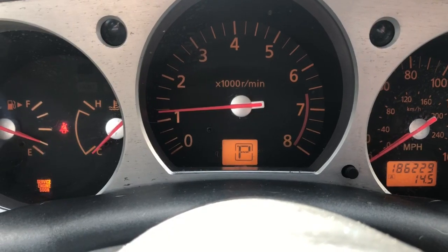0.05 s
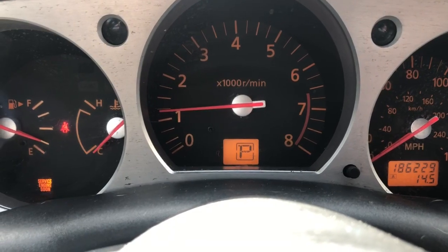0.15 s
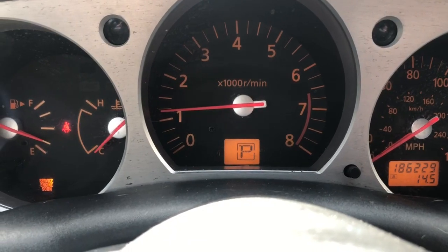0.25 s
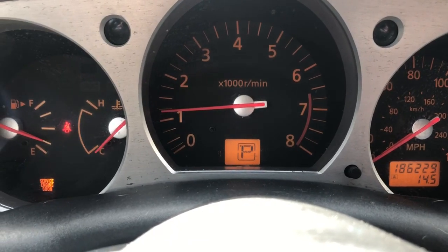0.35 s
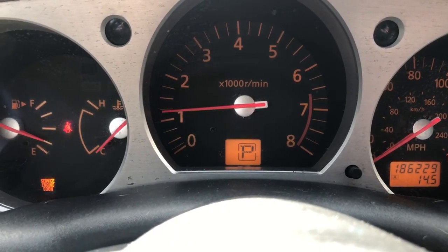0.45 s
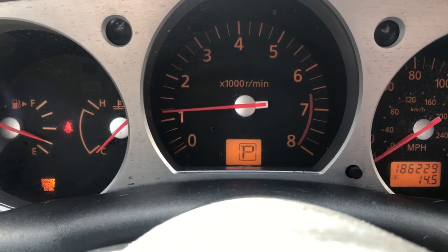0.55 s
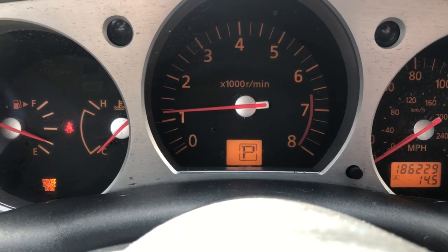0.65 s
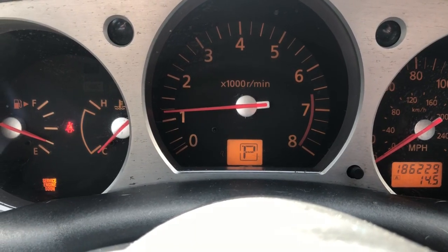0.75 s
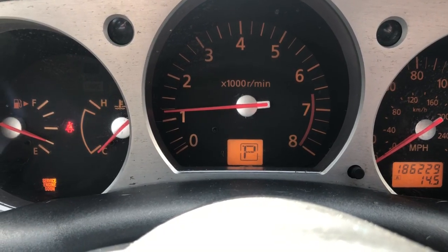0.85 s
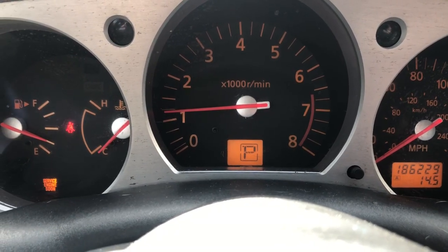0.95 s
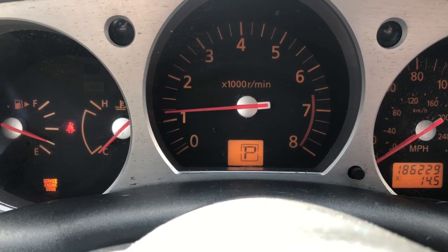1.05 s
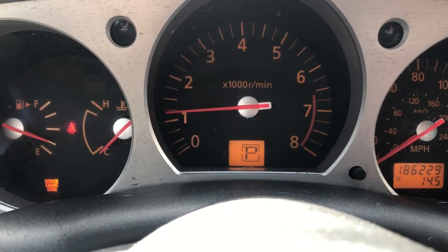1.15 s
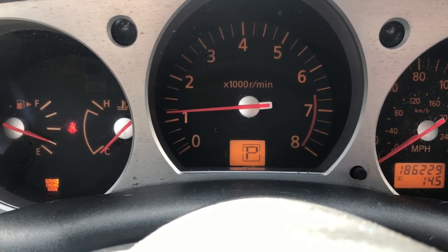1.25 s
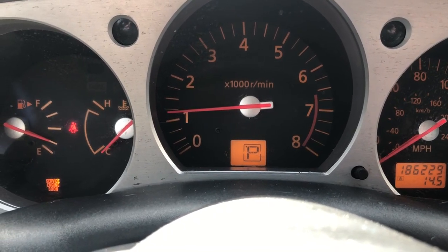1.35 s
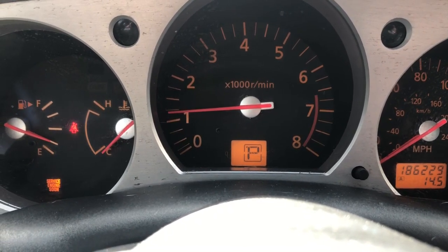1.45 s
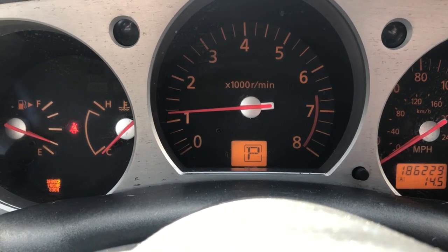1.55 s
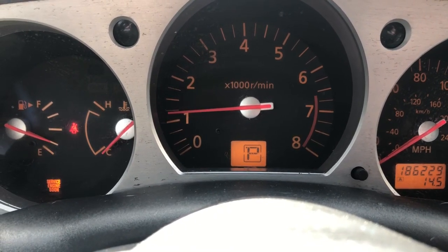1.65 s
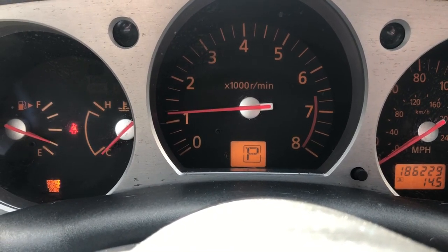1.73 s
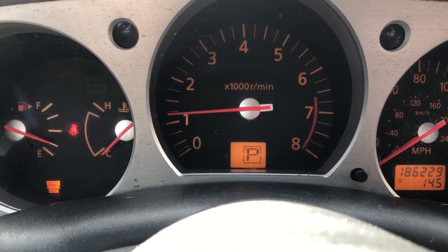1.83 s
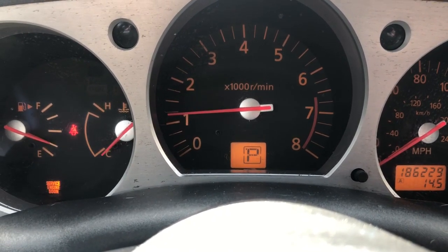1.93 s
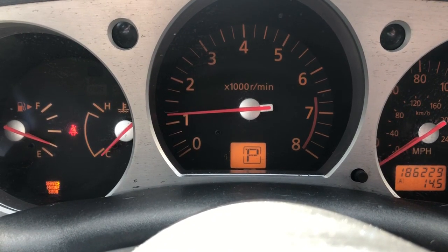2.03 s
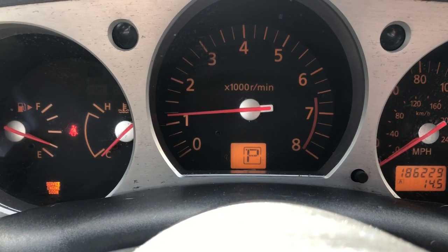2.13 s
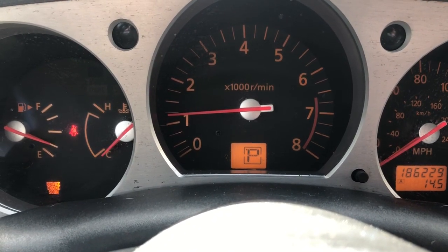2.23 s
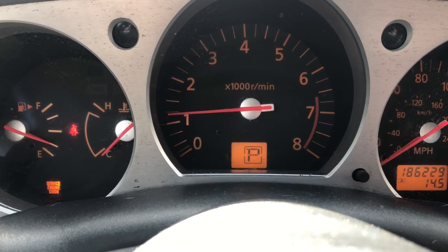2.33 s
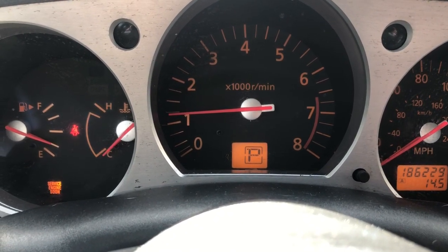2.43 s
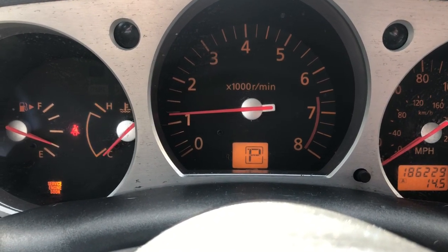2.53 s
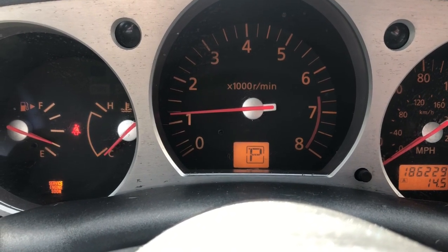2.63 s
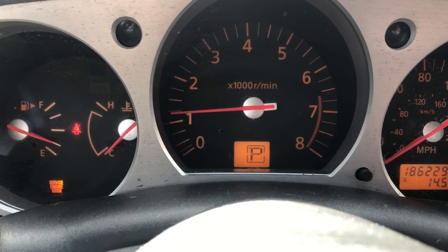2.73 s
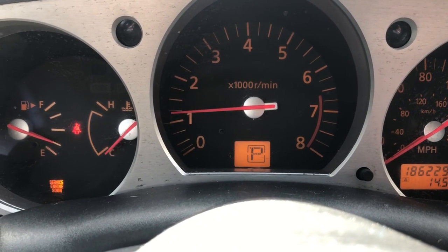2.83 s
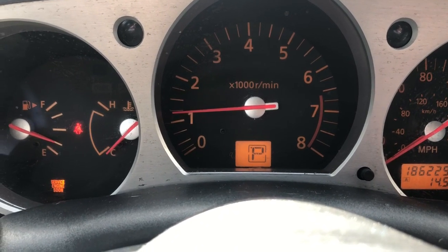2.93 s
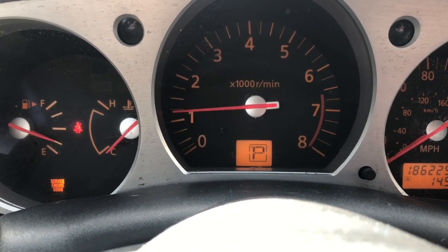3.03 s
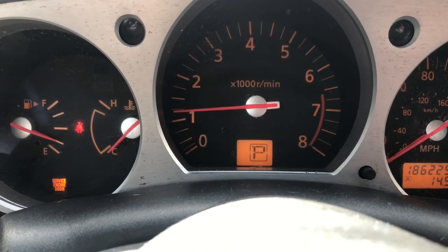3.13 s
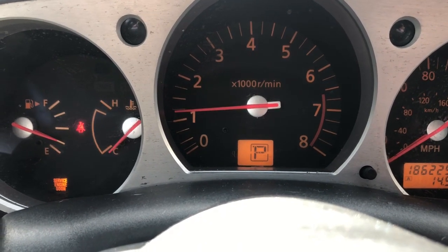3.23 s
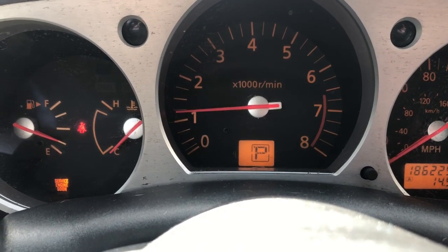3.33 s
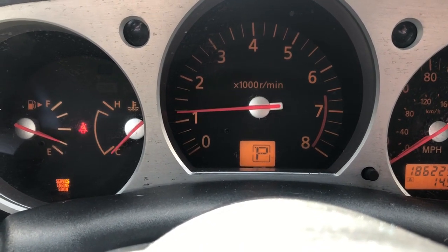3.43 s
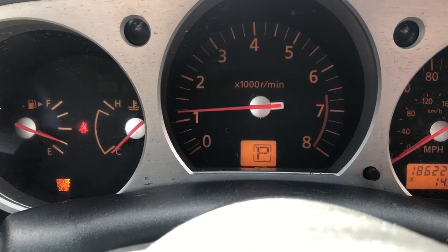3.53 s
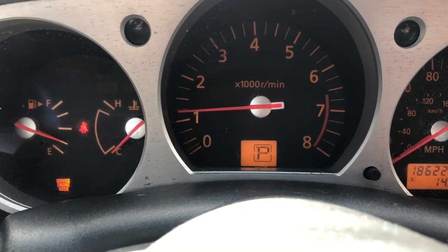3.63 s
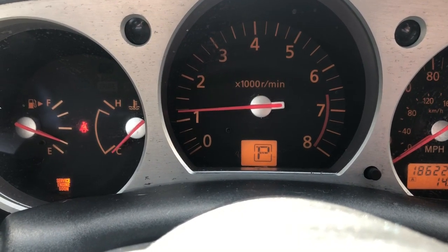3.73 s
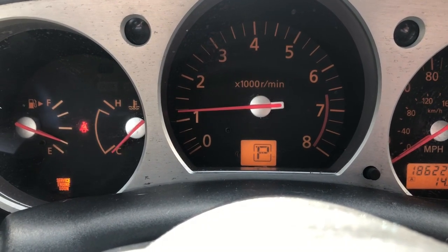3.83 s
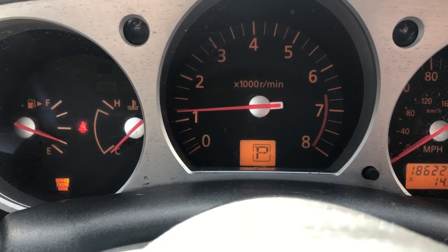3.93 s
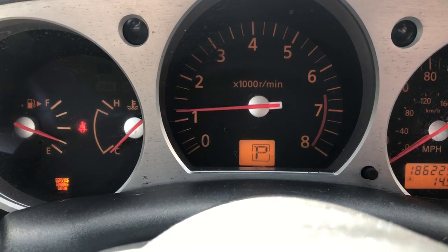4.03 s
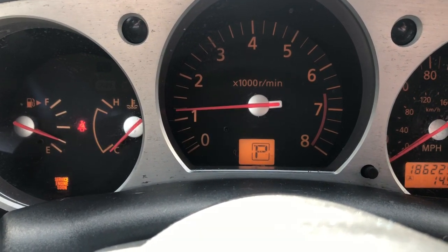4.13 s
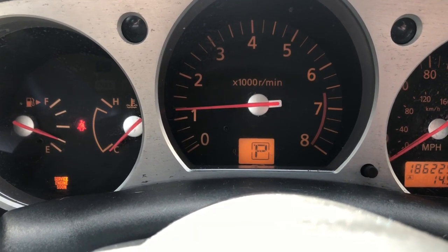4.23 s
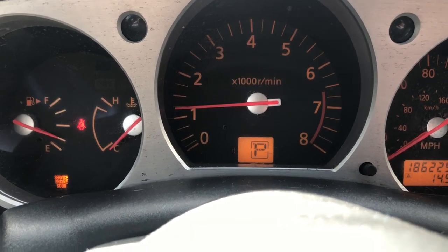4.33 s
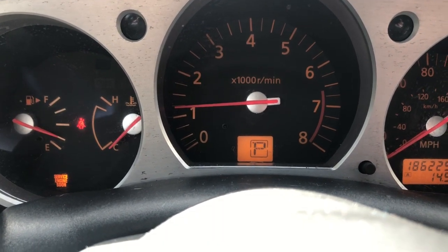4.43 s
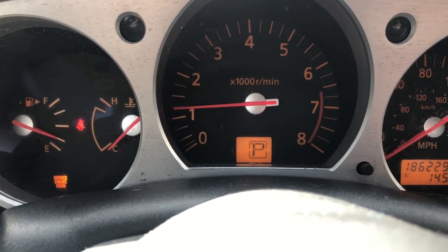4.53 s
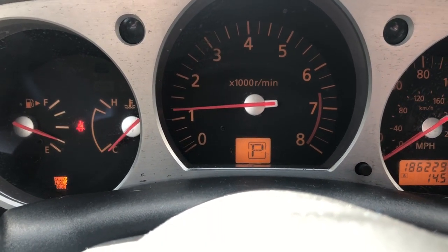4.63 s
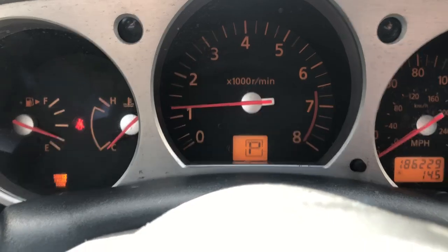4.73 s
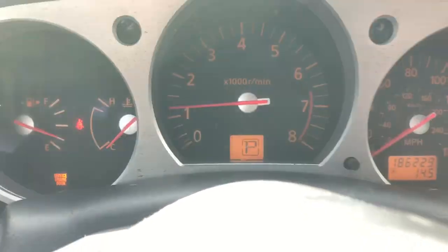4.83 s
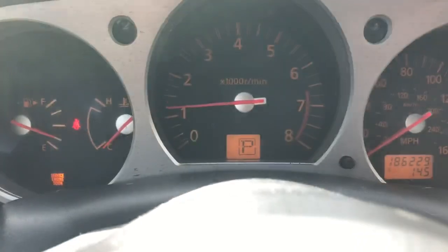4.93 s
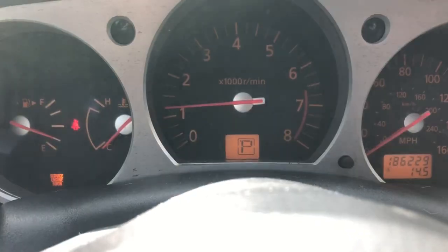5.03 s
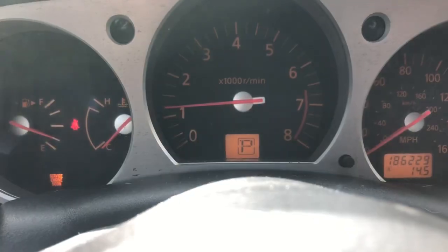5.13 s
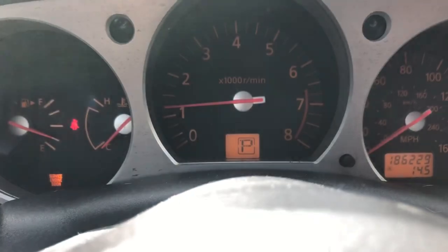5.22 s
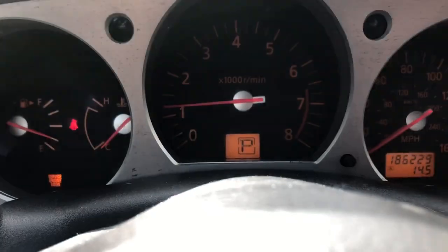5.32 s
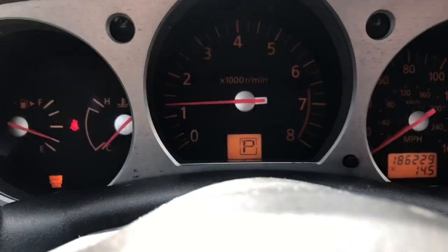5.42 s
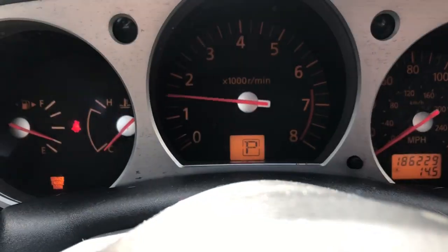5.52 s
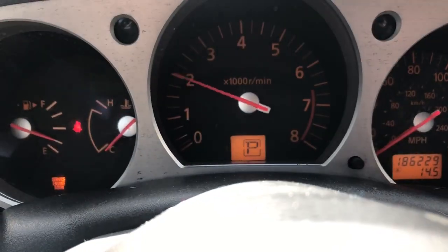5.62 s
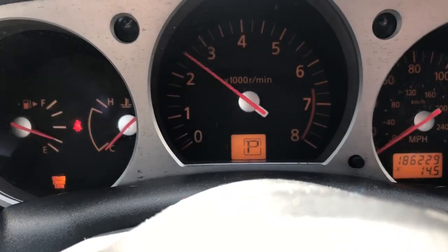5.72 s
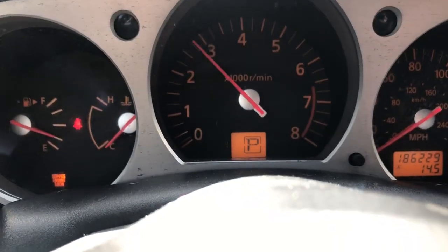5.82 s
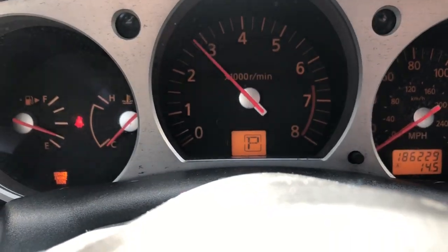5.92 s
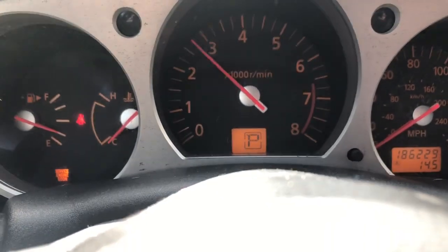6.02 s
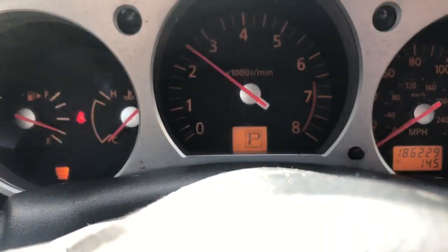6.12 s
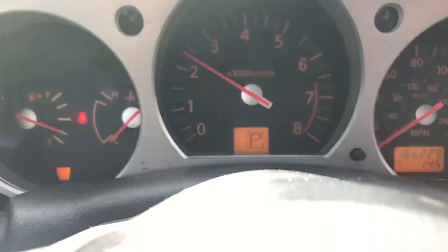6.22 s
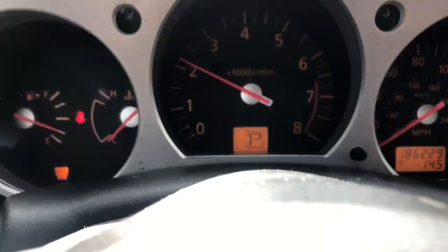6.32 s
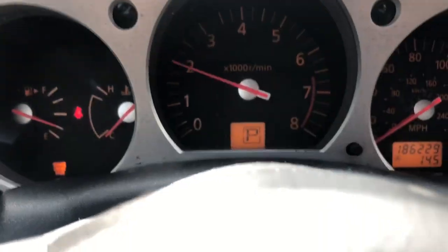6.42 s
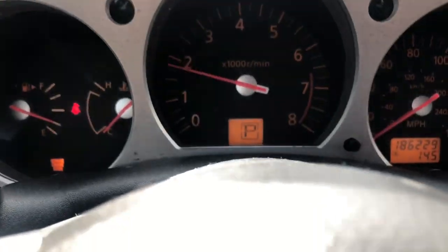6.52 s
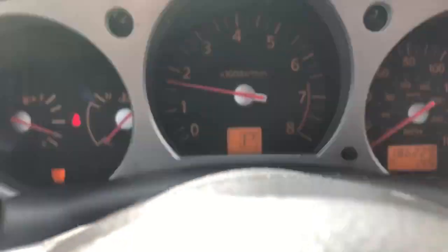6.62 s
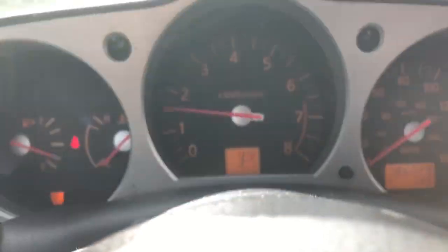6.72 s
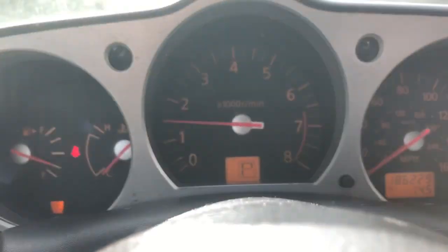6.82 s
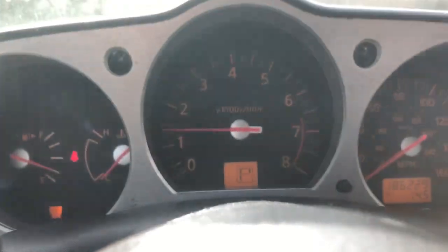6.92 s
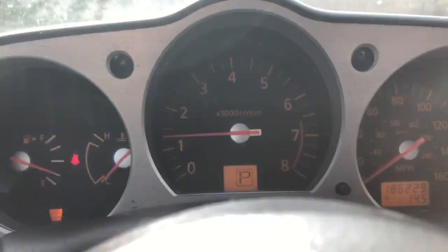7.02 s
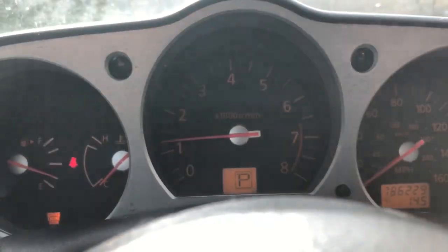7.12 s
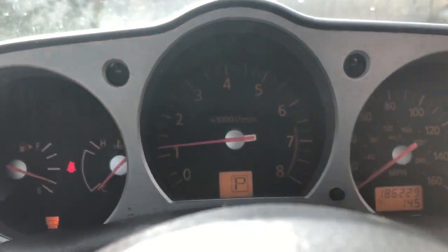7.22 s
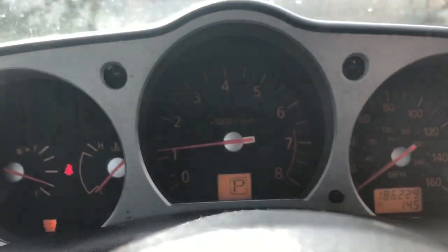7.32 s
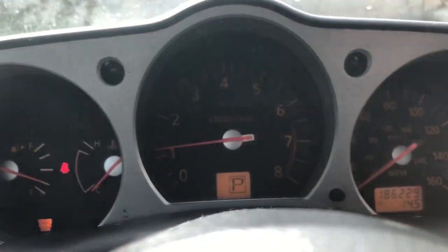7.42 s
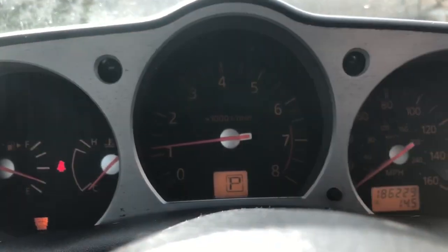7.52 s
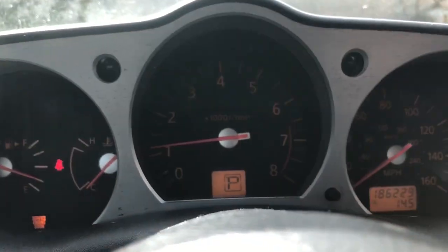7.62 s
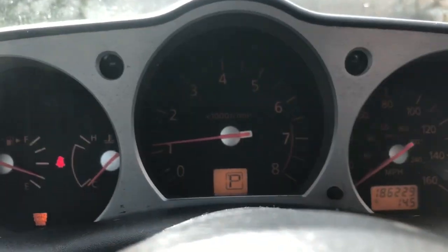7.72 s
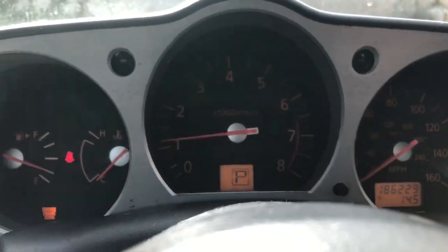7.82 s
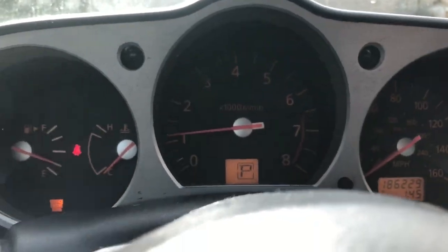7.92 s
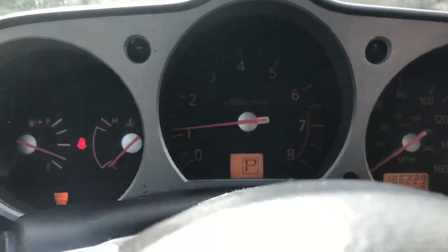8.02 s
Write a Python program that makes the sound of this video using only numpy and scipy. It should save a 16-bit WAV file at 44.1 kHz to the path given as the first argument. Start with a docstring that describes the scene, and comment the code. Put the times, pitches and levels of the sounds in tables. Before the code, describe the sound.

From inside a closed, parked car, the engine rumbles evenly at idle over a faint electrical whine from the dashboard. After about five seconds it revs once, climbing quickly in pitch and loudness with an intake roar, then falls more slowly to its low hum. As it settles, light clicks, one small hollow pop and some soft scuffs come from close by.

```python
"""The driver's seat of a parked car, doors shut, with a V6 idling.
One blip of the throttle takes it to 2600 rpm: the firing tones sweep through the cabin's booms,
the intake roars and the alternator whines, then it sinks back to idle.
Electrics sing faintly under the dash; a few small clicks, rubs and one hollow pop sound close by."""
import sys
import numpy as np
from scipy import signal
from scipy.fft import rfft, irfft, next_fast_len
from scipy.io import wavfile
from scipy.ndimage import uniform_filter1d

SR = 44100
rng = np.random.default_rng(int(sys.argv[2]) if len(sys.argv) > 2 else 0)


def persist_wave(psi):
    """Save psi, clipped to +-1, as 16-bit WAV."""
    counts = np.round(np.clip(psi, -1, 1) * 32767).astype(np.int16)
    wavfile.write(sys.argv[1], SR, np.atleast_2d(counts).T)


N = 355490
TIME = np.arange(N) / SR
IDLE_TURNS, TOP_TURNS = 18.8, 44  # crank turns a second
OPEN_AT_S, OPENING_S, SHUT_AT_S, SHUTTING_S = 5.39, 0.12, 5.683, 0.23  # the throttle blip
EXHAUST_LAG_S = 0.03
MOVE_AT_S, MOVING_S = 5.1, 0.68  # the microphone moves once, away from the valve hiss


def amp(db):
    """Decibels to gain."""
    return np.exp(np.asarray(db) * (np.log(10) / 20))


def unit_rms(x):
    """Scales to rms 1."""
    return x / np.sqrt(np.mean(x ** 2) + 1e-20)


def curve(rows):
    """An automation line through (seconds, value) points."""
    return np.interp(TIME, *np.transpose(rows))


def ramp(start_s, length_s):
    """A straight fade from 0 to 1."""
    return np.clip((TIME - start_s) / length_s, 0, 1)


def colour(points, hz):
    """Gain at hz of an EQ curve through (Hz, dB) points."""
    f, db = np.transpose(points)
    return amp(np.interp(np.log(hz + 1), np.log(f + 1), db))


def noise(shape, size=N):
    """Noise of rms 1, filtered by the gain shape(Hz)."""
    full = next_fast_len(size, True)
    hz = np.fft.rfftfreq(full, 1 / SR)
    spectrum = rng.standard_normal(2 * len(hz)).view(complex) * shape(hz)
    return unit_rms(irfft(spectrum, full)[:size])


def wander(hz, size=N):
    """Random drift of rms 1 across the scene, moving at up to about hz."""
    f = np.arange(1025) * SR / N
    slow = unit_rms(irfft(rfft(rng.standard_normal(2048)) / (1 + (f / hz) ** 4)))
    return np.interp(np.linspace(0, len(slow) - 1, size), np.arange(len(slow)), slow)


def add(mix, start_s, sound):
    """Mixes a sound in at start_s."""
    part = mix[round(start_s * SR):][:len(sound)]
    part += sound[:len(part)]


def crank():
    """Crankshaft turns a second, smoothed by the flywheel."""
    # Each row: time in seconds, turns a second.
    speed = [(0.0, 18.31), (1.4, 18.25), (2.6, 18.46), (4.1, 18.75), (4.7, 18.5), (5.35, 18.7),
             (5.46, 20.8), (5.53, 23.8), (5.66, 35.18), (5.77, 42.21), (5.9, 44.04), (6.02, 41.93),
             (6.45, 29.51), (6.8, 22.63), (7.05, 19.52), (7.35, 17.9), (8.06, 17.36)]
    return uniform_filter1d(curve(speed), size=3000)


def pace():
    """Engine speed as a share of the way from idle to the top of the blip."""
    return np.clip((crank() - IDLE_TURNS) / (TOP_TURNS - IDLE_TURNS), 0, None)


def throttle(lag_s=0):
    """How far the throttle is open, 0-1, felt lag_s later."""
    return ramp(OPEN_AT_S + lag_s, OPENING_S) - ramp(SHUT_AT_S + lag_s, SHUTTING_S)


def crank_tones(angle, orders, flutter_hz, rough=0.5):
    """Tones at multiples of the crank speed, wavering in strength and timing from cycle to cycle."""
    step = 10  # samples; low tones need only a coarse time step
    angle, out = angle[::step], 0
    for order, db in orders:
        phase = order * angle + 2 * np.pi * rng.random()
        strength = 1 + rough * wander(flutter_hz, len(angle))
        timing = rough * wander(flutter_hz, len(angle))
        out = out + amp(db) * (strength * np.sin(phase) + timing * np.cos(phase))
    return signal.resample_poly(out, step, 1)[:N] * np.sqrt(2 / (1 + 2 * rough ** 2))


def exhaust(angle):
    """Three firings a turn boom in the cabin, hard under throttle and weak while coasting."""
    # The cabin's booms. Each row: frequency in Hz, gain in dB.
    booms = [(50, -33), (55.5, -29.5), (61, -30.5), (68, -29), (80, -34.5), (92, -32), (102, -44),
             (114, -42.5), (128, -38), (148, -44.5), (158, -30.5), (166, -27.5), (180, -38.5), (215, -42),
             (258, -28.8), (400, -40.5)]
    # The firing tone and its next two harmonics. Each row: trim in dB, boost under throttle in dB,
    # change while coasting in dB, share of the drift, unsteadiness from 0 to 1.
    harmonics = [(0, 13.5, -11.5, 0.99, .05), (-8, 8.5, -1.5, -1, 0.07), (-12.5, 3, -12.5, 0, 0.07)]
    # The firing tone's slow drift. Each row: time in seconds, trim in dB.
    drift = [(1.4, -2.1), (2.8, 0.36), (4.2, 1.45), (5.3, .2), (6.8, -1), (7.4, -3)]
    # Unequal cylinders lope at idle. Each row: multiple of the crank speed, idle level in dB.
    lope_orders = [(1.5, -66), (2, -59), (2.5, -58), (3.5, -52), (4.5, -53.5), (5, -64.5), (7.5, -60),
                   (8.5, -55), (9.5, -59.5), (10.5, -53.5), (12, -64), (13.5, -63), (18, -62.5), (26, -65)]
    speed, gas, drift_db = crank(), throttle(EXHAUST_LAG_S), curve(drift)
    catch_at_s, fade_s = 6.48, 0.13  # the engine coasts until the idle control catches it
    coasting = ramp(SHUT_AT_S + SHUTTING_S, fade_s) - ramp(catch_at_s, fade_s)
    boom = 0
    for k, (db, throttle_db, coast_db, share, unsteady) in enumerate(harmonics):
        order = 3 * (k + 1)
        drive = amp(db + throttle_db * gas + coast_db * coasting + share * drift_db)
        strength = drive * colour(booms, order * speed) * (1 + unsteady * wander(26))
        boom = boom + strength * np.sin(order * angle)
    lope = crank_tones(angle, lope_orders, flutter_hz=3.1)
    return np.sqrt(2) * boom + lope * (speed[0] / speed) ** 2  # the lope evens out with speed


def engine_bay(angle):
    """Mechanical noise throbs once a turn, and the valve train hisses in time with the firings."""
    # Idle noise through the bulkhead, then valve hiss. Each row: frequency in Hz, relative level in dB.
    idle_eq = [(15, -22.5), (35, 1), (110, -1.5), (210, -2), (320, -7), (410, -12.5), (480, -8.5),
               (600, -15.5), (655, -15), (720, -10.5), (850, -20), (1150, -22.5), (1500, -32.5),
               (4000, -54.5)]
    valve_eq = [(800, -28), (1500, -18), (1780, 1), (2000, -8), (2300, -5), (2700, -8.5), (3150, 0.5),
                (3600, -6.5), (4200, -17), (8000, -32)]
    firing = np.cos(3 * angle)
    throb = 1 + 0.13 * np.cos(angle) + 0.078 * np.cos(angle / 2) + 0.031 * firing
    rumble = amp(-49.0) * noise(lambda hz: colour(idle_eq, hz)) * throb
    valve_db = -69.5 - 4 * ramp(MOVE_AT_S, MOVING_S)
    valves = amp(valve_db) * noise(lambda hz: colour(valve_eq, hz))
    chatter = unit_rms(amp(1.4 * firing + 1.3 * wander(22)))
    return rumble + valves * chatter


def alternator():
    """A whine that follows the belt, a moment ahead of the exhaust, and grows with speed."""
    order, idle_db, rise_db = 85.5, -89.5, 14
    belt = np.interp(TIME + EXHAUST_LAG_S, TIME, crank())
    hz = order * belt * (1 + .006 * wander(60))
    speed_db = idle_db + rise_db * np.tanh(2 * pace())
    pull_db = 8.5 * throttle(-EXHAUST_LAG_S) * (1 - pace())  # as the throttle pulls it up from idle
    resonance_db = 15.5 / (1 + ((hz - 1750) / 50) ** 2)  # probably its bracket
    level = amp(speed_db + pull_db + resonance_db + 3 * wander(18))
    return np.sqrt(2) * level * np.sin(2 * np.pi * np.cumsum(hz) / SR)


def electrics():
    """Two switching rates and a small motor sing at steady pitches under the dash."""
    # Each row: pitch in Hz, base level in dB, change in dB once the microphone has moved.
    partials = [(800.5, -67.5, -6), (943, -71, -4), (976.3, -75, -12), (1952.6, -86, -8), (2400, -73, -2),
                (2928.9, -75, -16), (3200, -79, -7), (3905, -88, -6), (4800, -83.5, -3), (5600, -97, -3),
                (12000, -106, 6)]
    # One fader for them all. Each row: time in seconds, trim in dB.
    fader = [(4.9, -.5), (5.6, -2.5), (6, -7.5), (6.8, -4.5), (7.3, -0.2)]
    moved = ramp(MOVE_AT_S, MOVING_S)
    tones = sum(amp(db + change * moved) * np.sin(2 * np.pi * hz * TIME) for hz, db, change in partials)
    return np.sqrt(2) * tones * amp(curve(fader) + 0.57 * wander(1.8))


def cabin_hiss():
    """A soft bed of hiss that lifts a little near the end."""
    # Each row: frequency in Hz, relative level in dB.
    hiss_eq = [(100, 0), (1000, -1.5), (2400, -3), (3500, -7), (4200, -8), (5200, -8.5), (7000, -14),
               (10000, -18), (13000, -23.5), (13800, -12), (14500, -21.5), (16000, -24.5)]
    # Each row: time in seconds, level in dB.
    fader = [(6.5, -72), (7.3, -69)]
    return amp(curve(fader)) * noise(lambda hz: colour(hiss_eq, hz))


def rubs():
    """Soft scuffs of grainy friction that swell and fade."""
    # Each row: midpoint in seconds, half-length in seconds, level in dB, centre in Hz, width in octaves.
    cues = [(4.8, 0.031, -50, 414, 0.42), (6.08, 0.046, -71, 7000, 1), (6.213, 0.073, -76, 7000, 1),
            (6.681, 0.06, -69.5, 6200, 0.43), (6.757, 0.037, -56.5, 2370, 1.07),
            (6.784, .07, -73, 8300, 0.33), (7.083, 0.039, -58, 3500, 0.7), (7.266, .1, -69.5, 3500, 1.2),
            (7.811, 0.055, -43, 254, 0.7), (7.89, .05, -52, 900, 0.67), (7.926, 0.059, -37.5, 207, 0.7),
            (7.958, 0.047, -53, 750.5, 1), (7.942, 0.25, -70, 4000, 1.2)]
    out = np.zeros(N)
    for middle_s, half_s, db, centre_hz, octaves in cues:
        size = int(2 * half_s * SR)
        friction = rng.standard_normal(size)
        grain_db = 2.3 * unit_rms(uniform_filter1d(rng.standard_normal(size), size=60))
        off_centre = np.log2((np.fft.rfftfreq(size, 1 / SR) + 1) / centre_hz) / octaves
        band = rfft(friction * amp(grain_db)) / (1 + off_centre ** 2 / 2) ** 2
        rub = unit_rms(irfft(band, size))
        add(out, middle_s - half_s, amp(db) * rub * np.hanning(size) ** 2)
    return out


def clicks():
    """Each click is a short burst with one ring that dies sooner, and a faint tail in the cabin."""
    # Each row: start in seconds, level in dB, decay in seconds, ring in Hz, ring against burst in dB.
    cues = [(4.7977, -50, 0.0028, 8000, -12), (4.8115, -58, 0.0025, 2500, 6),
            (6.262, -49.5, 0.0023, 2300, -1), (6.342, -58, .003, 4000, -6),
            (6.8236, -53.5, 0.0016, 2340, 10), (7.0038, -39, 0.0029, 2300, 2),
            (7.061, -52, .001, 11000, -3), (7.796, -40, 0.012, 2344, -9), (7.894, -47, 0.0021, 8010, -13),
            (8.007, -50.5, 0.0038, 12000, -11)]
    # The burst's colour. Each row: frequency in Hz, relative level in dB.
    burst_eq = [(200, -18), (800, 6.5), (1500, 2.5), (2400, -1), (4000, -7.5), (6000, -9.5), (10000, -18),
                (16000, -28)]
    out, t = np.zeros(N), TIME[:4096]
    for start_s, db, decay_s, ring_hz, ring_db in cues:
        envelope = np.exp(-t / decay_s) + 0.078 * np.exp(-t / 0.039)
        burst = noise(lambda hz: colour(burst_eq, hz), size=len(t)) * envelope
        ring = np.sqrt(2) * amp(ring_db) * np.sin(2 * np.pi * ring_hz * t) * np.exp(-t / (0.79 * decay_s))
        add(out, start_s, amp(db) * (burst + ring))
    return out


def rev(angle):
    """Under load the cylinders growl and the intake roars; belts and fan rush more as they speed up."""
    # Each row: multiple of the crank speed, relative level in dB.
    growl_orders = [(1.5, -36), (2, -39), (2.5, -47), (3.5, -51), (4, -51), (4.5, -33.5), (5, -43),
                    (5.5, -47.5), (6.5, -45), (7.5, -49), (8.5, -41.5), (10.5, -50.5), (12, -47.5),
                    (13.5, -50.5), (18, -62)]
    # The roar through the bulkhead. Each row: frequency in Hz, relative level in dB.
    roar_eq = [(20, -24), (60, -4), (120, -2.5), (190, -1.5), (330, 1), (480, -10), (730, -22),
               (1000, -20.5), (1300, -30.5), (1700, -38.5), (2700, -47), (5000, -50.5), (16000, -73.5)]
    growl = crank_tones(angle, growl_orders, flutter_hz=6.1)
    roar = amp(-32.0) * noise(lambda hz: colour(roar_eq, hz)) * (1 + 0.45 * np.cos(3 * angle))
    pulling = amp(1.35) * throttle() * (crank() / TOP_TURNS) ** 1.63
    spinning = amp(-10.5) * pace() ** 0.74  # carries on with the throttle shut
    effort = np.hypot(pulling, spinning)
    rush = amp(-52.5) * noise(lambda hz: hz / (1 + (hz / 700) ** 3.3))
    # Something in the drive rings thinly at high speed.
    sizzle = amp(-74) * noise(lambda hz: 1 / (1 + ((hz - 4400) / 50) ** 2)
                              + .3 / (1 + ((hz - 5000) / 1500) ** 2))
    return cabin(effort * (growl + roar) + pace() * (rush + sizzle))


def cabin(x):
    """Sound that sweeps through the cabin's standing waves swells and dips."""
    # Each row: frequency in Hz, gain in dB.
    standing_waves = [(220, 4), (258, 1.5), (298, -2), (340, 1.5), (408, -10), (455, 0.5), (520, 4),
                      (570, 1), (635, -6.5), (730, 9), (860, -2.5), (1050, 0.5), (1250, 1), (1550, -1.5)]
    full = next_fast_len(N + 4096, True)
    return irfft(rfft(x, full) * colour(standing_waves, np.fft.rfftfreq(full, 1 / SR)), full)[:N]


def pop():
    """A small cavity rings for a few cycles as it opens, falling in pitch."""
    # In order: start in seconds, length in seconds, level in dB, first and last pitch in Hz.
    cue = (7.0037, .0086, -33.5, 850, 550)
    start_s, length_s, db, first_hz, last_hz = cue
    out, hz = np.zeros(N), np.linspace(first_hz, last_hz, int(length_s * SR))
    ring = np.sin(2 * np.pi * np.cumsum(hz) / SR)
    add(out, start_s, amp(db) * ring * signal.windows.tukey(len(hz), .3))
    return out


def scene():
    """The engine, the electrics and the small near sounds over the cabin's hiss, in mono."""
    angle = 2 * np.pi * np.cumsum(crank()) / SR
    engine = exhaust(angle) + engine_bay(angle) + rev(angle) + alternator()
    return (engine + electrics() + clicks() + rubs() + pop() + cabin_hiss())[None]


def record(dry):
    """A steep low-pass trims the very top of the treble."""
    low_pass = signal.firwin(511, 15720, window=("kaiser", 9), fs=SR)
    return signal.oaconvolve(dry, low_pass[None], "same")


dry = scene()
out = record(dry)
persist_wave(out)
```